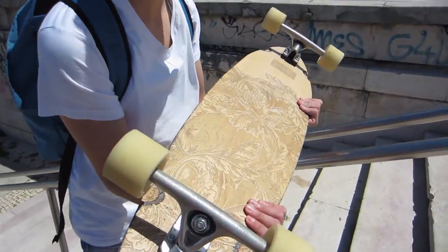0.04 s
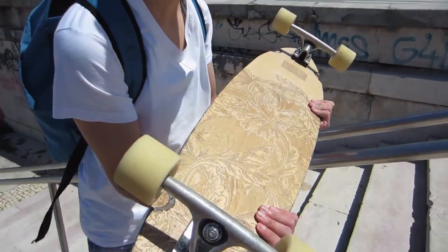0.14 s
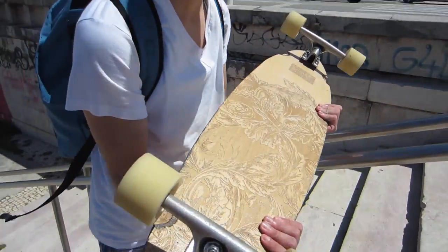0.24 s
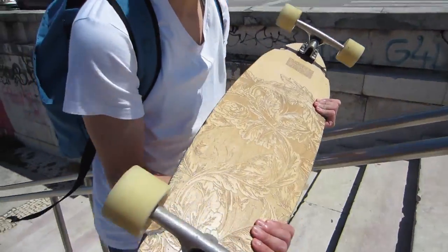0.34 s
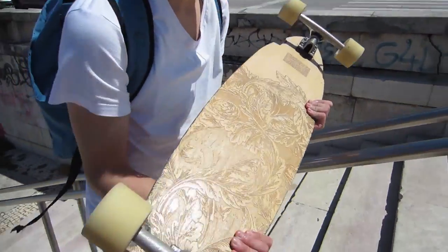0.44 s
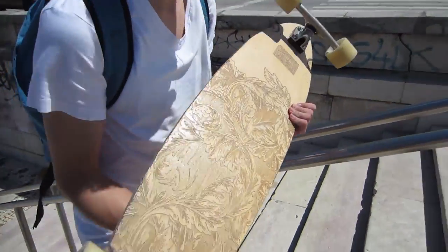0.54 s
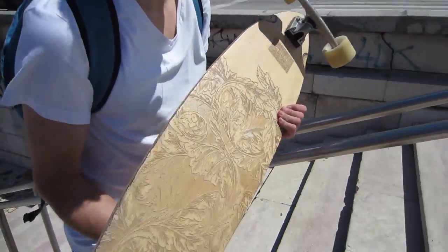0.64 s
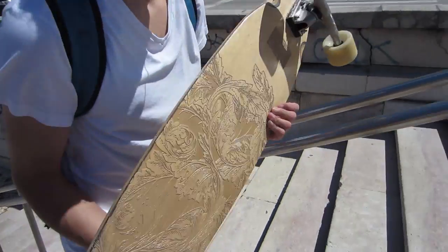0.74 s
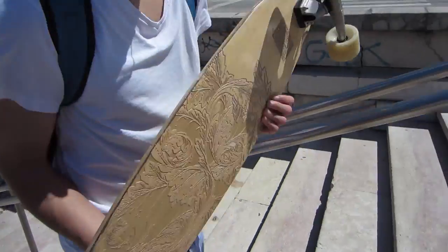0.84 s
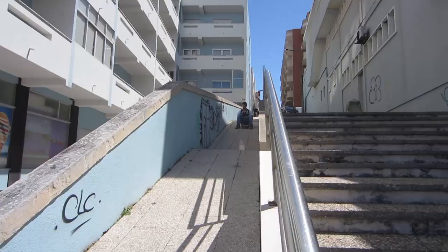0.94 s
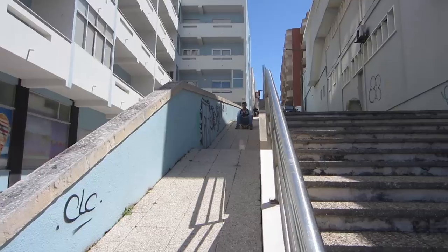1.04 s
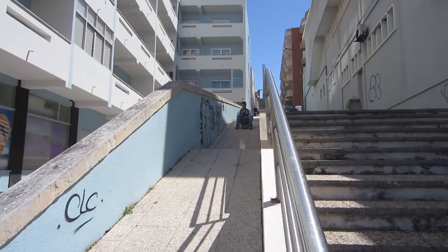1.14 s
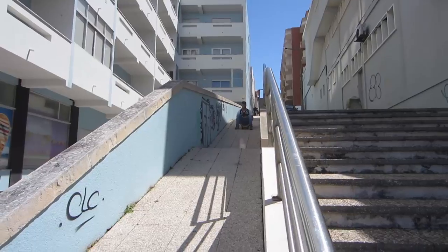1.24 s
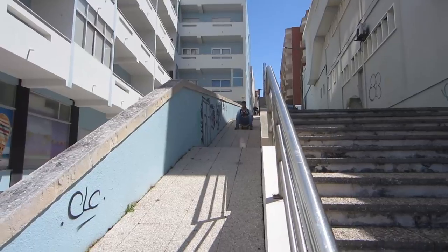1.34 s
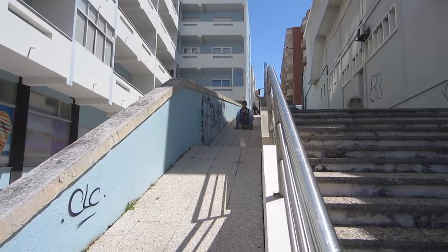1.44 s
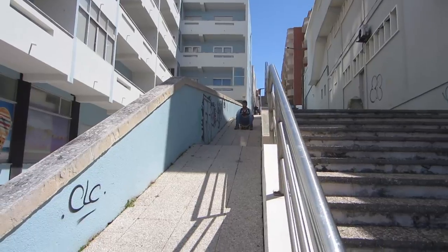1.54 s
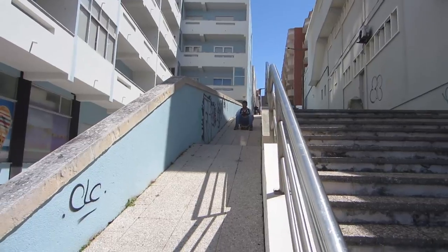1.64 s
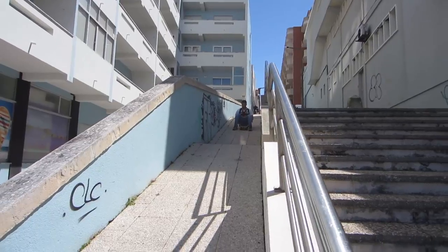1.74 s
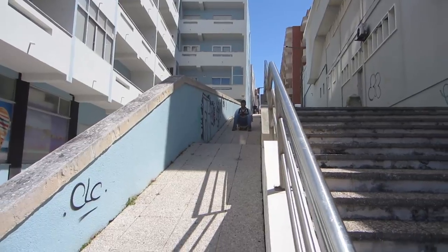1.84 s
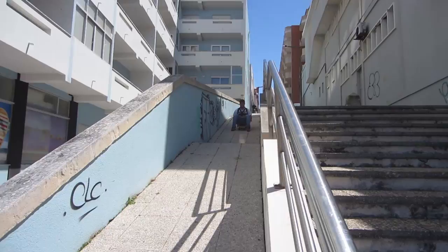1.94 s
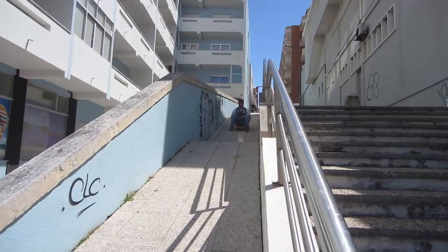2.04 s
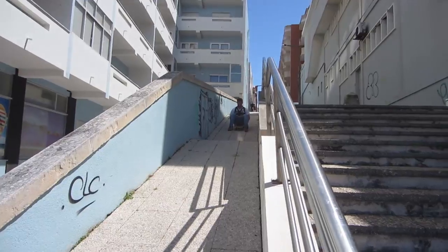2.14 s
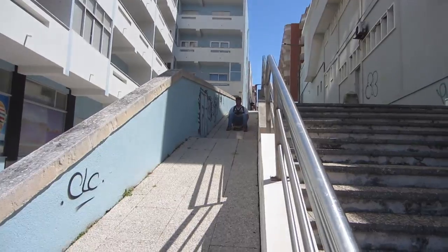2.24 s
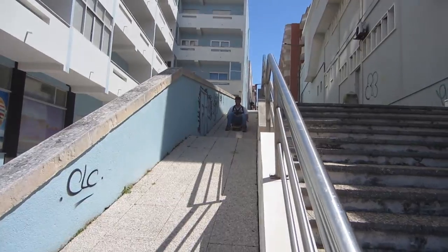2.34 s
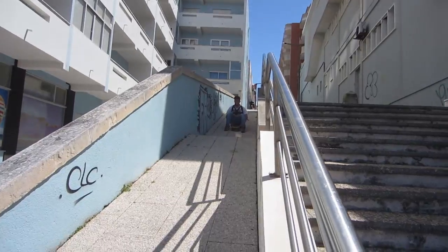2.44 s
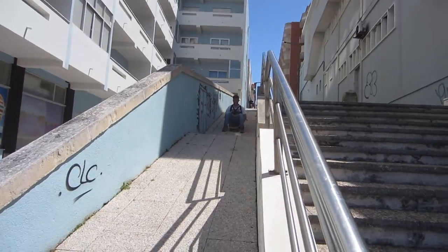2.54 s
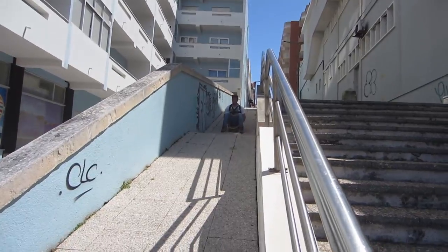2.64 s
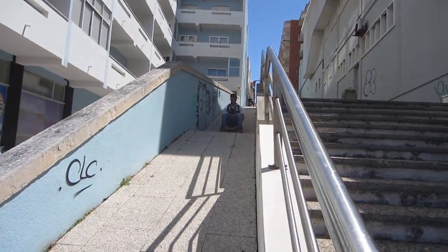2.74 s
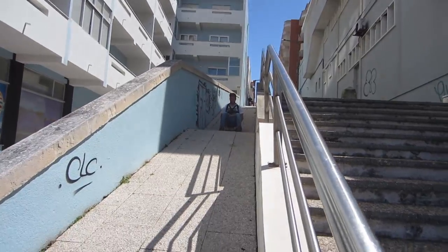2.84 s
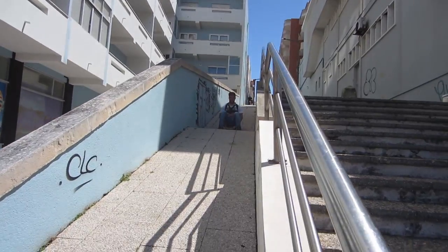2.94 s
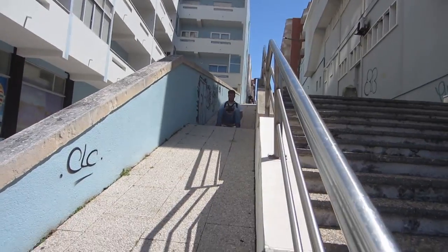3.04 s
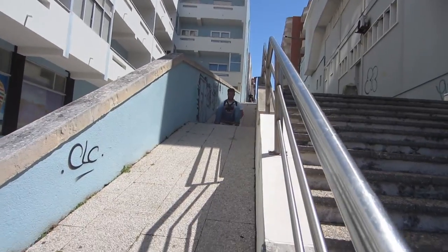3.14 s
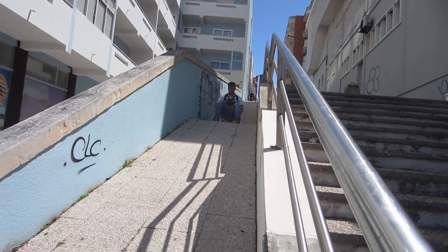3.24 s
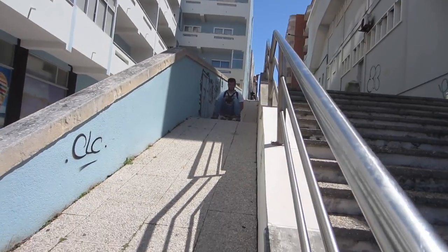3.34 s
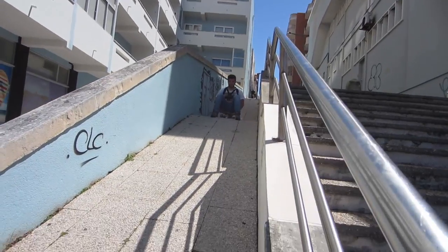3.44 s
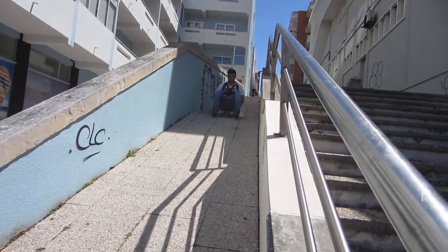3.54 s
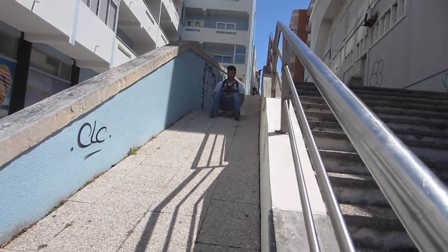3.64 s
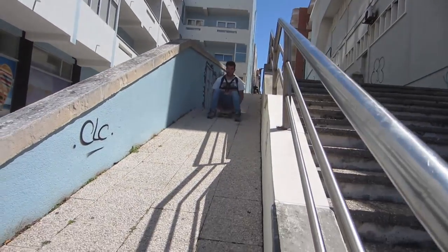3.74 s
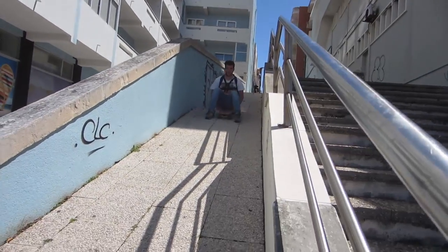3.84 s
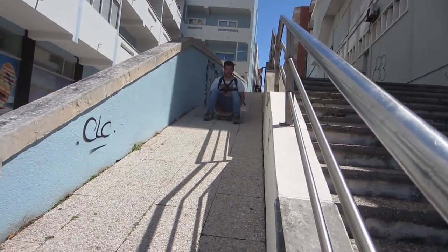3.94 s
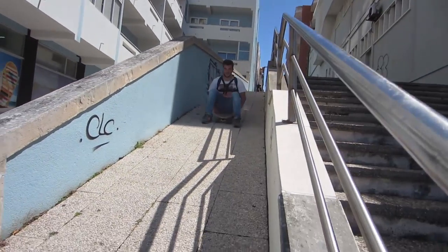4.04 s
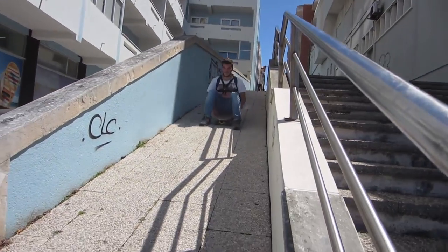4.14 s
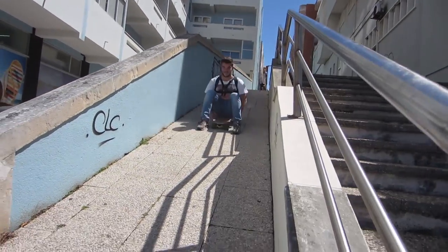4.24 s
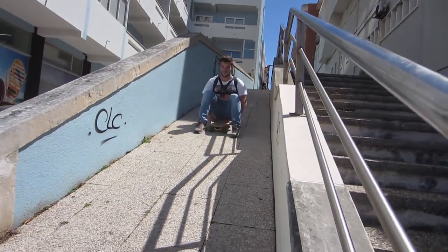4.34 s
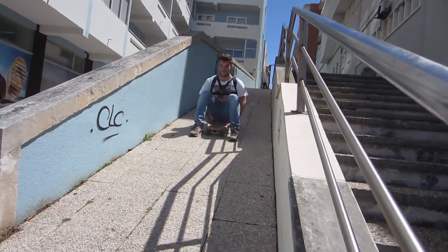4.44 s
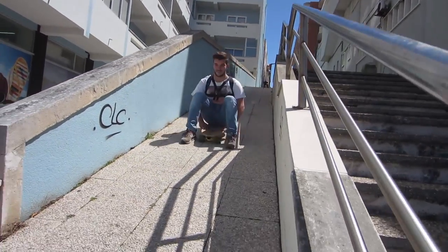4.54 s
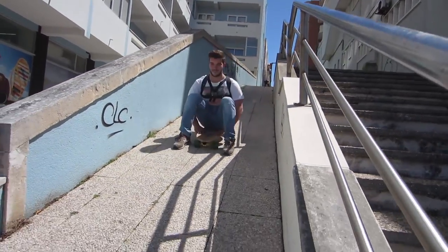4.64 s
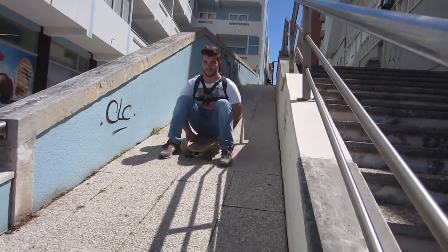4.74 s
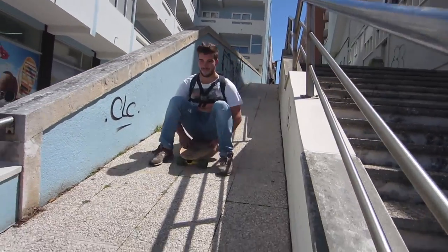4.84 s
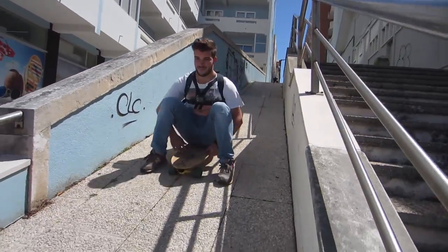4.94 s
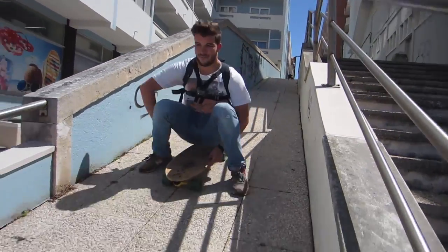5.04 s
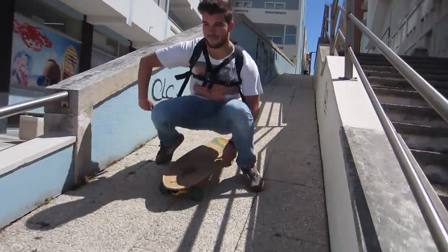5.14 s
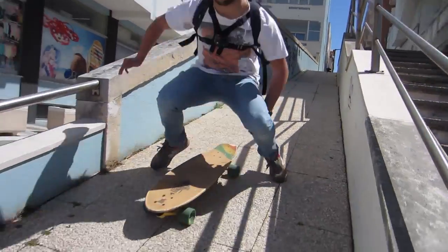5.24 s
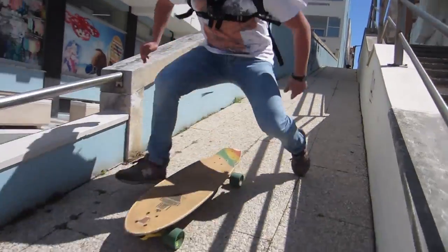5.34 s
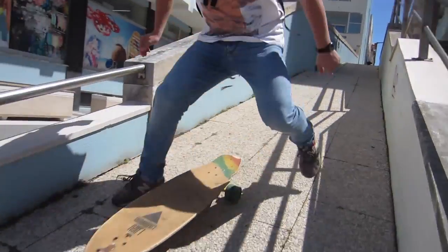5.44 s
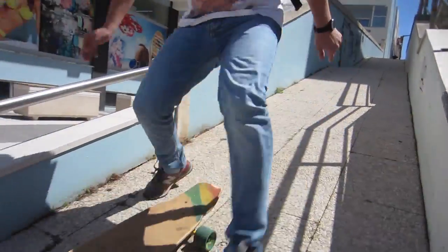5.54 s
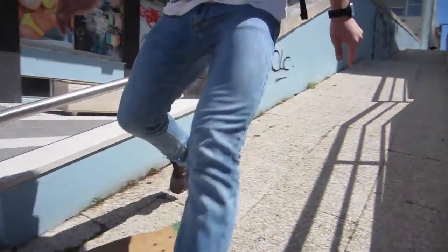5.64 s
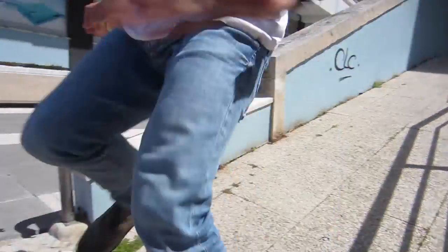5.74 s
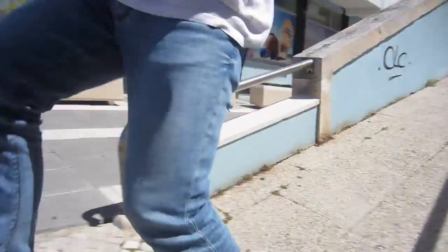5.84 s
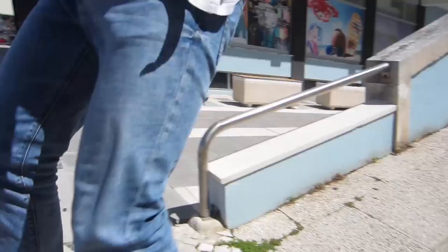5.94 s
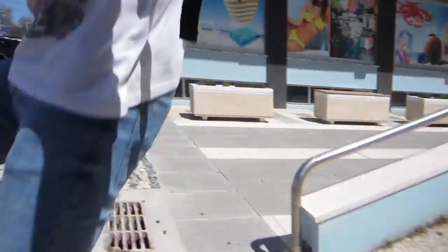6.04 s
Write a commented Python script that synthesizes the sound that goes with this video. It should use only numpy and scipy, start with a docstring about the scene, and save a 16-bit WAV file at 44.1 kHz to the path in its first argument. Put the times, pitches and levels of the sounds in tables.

```python
"""Wind first: gusts thud and flutter on two microphone ports, as noise and damped swings in opposite phase.
A longboard then rolls down a gritty tiled ramp between house walls towards a hand-held camera.
Random stone grains drive the filtered roar of wheels and deck; tile joints ring decaying modes.
The seated rider drags his shoes, bursts of grains, then jumps off and runs past on modal steps.
The riderless deck rattles and knocks; the walls echo by a delayed copy and decaying noise."""
import sys
import numpy as np
from scipy import signal
from scipy.fft import rfft, irfft, next_fast_len
from scipy.io import wavfile
from scipy.ndimage import uniform_filter1d, map_coordinates

SR = 44100
rng = np.random.default_rng(int(sys.argv[2]) if len(sys.argv) > 2 else 0)


def persist_wave(psi):
    """Save psi, clipped to +-1, as 16-bit WAV."""
    counts = np.round(np.clip(psi, -1, 1) * 32767).astype(np.int16)
    wavfile.write(sys.argv[1], SR, np.atleast_2d(counts).T)


N = 268594
T = np.arange(N) / SR  # time [s]
OPPOSED = np.array([[1], [-1]])  # left and right in opposite phase


def undb(db):
    """Level to amplitude: 20 dB is a factor of ten."""
    return 10 ** (np.asarray(db) / 20)


def unit(x):
    """Normalise the mean power to 1."""
    return x / np.sqrt(np.mean(x ** 2))


def curves(rows):
    """Linear interpolation in time of every column of a table."""
    s, *columns = np.transpose(rows)
    return [np.interp(T, s, c) for c in columns]


def noise():
    """White noise: equal mean power at every frequency."""
    return rng.standard_normal(N)


def walk(rate):
    """Low-passed randomness: a wander of rms 1 through new random values at a rate [1/s]."""
    hold = max(int(SR / rate), 1)
    held = np.repeat(rng.standard_normal(N // hold + 1), hold)
    return unit(uniform_filter1d(held, hold)[:N])


def filtered(x, response):
    """Linear filtering as a product of spectrum and frequency response, normalised to rms 1."""
    size = next_fast_len(N + SR // 2)
    f = np.fft.rfftfreq(size, 1 / SR) + 1  # offset by 1 Hz to keep clear of zero
    return unit(irfft(rfft(x, size) * response(f), size)[:N])


def colour(x, points):
    """Spectral shaping through (frequency [Hz], level [dB]) points, falling 12 dB per octave above the last."""
    hz, db = np.transpose(points)

    def response(f):
        return undb(np.interp(np.log(f), np.log(hz), db)) * np.minimum(hz[-1] / f, 1) ** 2

    return filtered(x, response)


def resonate(x, modes):
    """Parallel damped oscillators (frequency [Hz], width [Hz], relative level [dB]) driven by a sound."""
    def response(f):
        return sum(undb(db) / (1 + 1j * (f * f - hz * hz) / (f * width)) for hz, width, db in modes)

    return filtered(x, response)


def low_pass(x, order, hz):
    """Zero-phase low-pass: run forward and backward, it delays no component."""
    return signal.sosfiltfilt(signal.butter(order, hz, fs=SR, output="sos"), x)


def low_cut(x, hz):
    """High-pass filter: attenuation below a cutoff frequency."""
    return signal.sosfilt(signal.butter(2, hz, "high", fs=SR, output="sos"), x)


def grains(rate, spread_db):
    """Random impulse train of tiny impacts of either sign, with exponentially spread hardness."""
    draw = rng.random(N)
    hit = draw < rate / SR
    hardness = rng.exponential(size=N)[hit]
    side = rng.random(N)[hit] - .5
    out = np.zeros(N)
    out[hit] = np.sign(side) * undb(spread_db * np.minimum(hardness, 4))
    return unit(out)


def waver(x, share, rate):
    """Frequency modulation by uneven reading speed: all resonances drift by an rms share of their pitch."""
    position = np.cumsum(1 + share * walk(rate))
    return map_coordinates(x, [position], order=3, mode="mirror")


def envelope(start_s, length_s, attack_s, release_s):
    """Amplitude contour: a linear rise centred on the start, a hold, an exponential decay."""
    out = np.zeros(N)
    first, last = np.searchsorted(T, [start_s - attack_s, start_s + length_s + 10 * release_s])
    age = T[first:last] - start_s
    rise = np.clip(age / attack_s + .5, 0, 1)
    out[first:last] = rise * np.exp(-np.maximum(age - length_s, 0) / release_s)
    return out


def swells(rows, attack_s, release_s):
    """Superposed amplitude contours of (start [s], length [s], level [dB]) events."""
    return sum(undb(db) * envelope(s, length_s, attack_s, release_s) for s, length_s, db in rows)


def add(out, s, sound):
    """Superposition: mix a short sound in at a time [s]."""
    i = int(s * SR)
    out[i:i + len(sound)] += sound[:N - i]


def strike(modes, pitch=1, contact_s=0.00063):
    """Modal impact: decaying sines, each blow exciting and tuning them a little differently."""
    t = np.arange(SR // 4) / SR
    chance = rng.standard_normal((len(modes), 2))
    ring = 0
    for (hz, t60, db), (detune, weight) in zip(modes, chance):
        decay = undb(db + 1.5 * weight - 60 * t / t60)
        ring = ring + decay * np.sin(2 * np.pi * hz * pitch * (1 + .006 * detune) * t)
    return ring * (1 - np.exp(-t / contact_s))


def town(db=-50):
    """Ambient noise of the distant streets: a faint coloured hum under slow random level modulation."""
    # spectrum of the distant town: (frequency [Hz], level [dB])
    town_colour = [(30, -3.5), (150, 5), (400, -14.5), (1000, -17.5), (2500, -26.5), (3200, -34),
                   (6500, -37), (10000, -46.5), (15000, -56)]
    return undb(db + walk(6.8)) * colour(noise(), town_colour)


def whirr(db=-56, end_s=0.2, fade_s=0.064):
    """Stationary coloured noise with exponential decay: a faint whirr that dies away early on."""
    # spectrum of the whirr: (frequency [Hz], level [dB])
    whirr_colour = [(500, -8), (1000, -2), (2000, 2), (2500, -6), (3200, -20), (4000, -17), (6000, -20),
                    (8000, -19), (11000, -36)]
    return undb(db) * np.exp(-np.clip((T - end_s) / fade_s, 0, 20)) * colour(noise(), whirr_colour)


def breeze(mid_db=-4):
    """Low-frequency pressure noise: slow air keeps a deep, partly opposed rumble going at the ports."""
    # slow air at the ports: (time [s], level [dB])
    slow_air = [(.4, -42.5), (1.4, -31.5), (1.9, -42), (2.7, -25.5), (3.9, -43), (4.4, -29), (5.1, -38),
                (6.0, -52)]
    level_db, = curves(slow_air)
    shape = [(20, -14.0), (55, 1.5), (100, 0.5), (170, -3.0), (400, -41.5)]
    return undb(level_db) * (OPPOSED * colour(noise(), shape) + undb(mid_db) * colour(noise(), shape))


def wind(thud_mid_db=-10, flutter_mid_db=-11, eddy_db=4.5):
    """Turbulence: eddies hit the ports mostly in opposite phase, as a low thud and a higher flutter."""
    # gusts at the ports: (start [s], length [s], low thudding level [dB], fluttering level [dB])
    gust_rows = [(0, 0.2, -27, -35), (0.246, 0.12, -20.5, -29), (0.442, 0.1, -25.5, -33),
                 (0.564, 0.05, -23.5, -29.5), (0.661, 0.35, -24, -25), (2.56, 0.077, -26, -50),
                 (2.797, 0.19, -17, -51), (3.119, 0.22, -18.5, -43), (3.386, 0.099, -15.5, -21.5),
                 (3.53, 0.08, -22.5, -30.5), (4.206, 0.078, -18.5, -44), (4.483, 0.15, -14.5, -32),
                 (4.626, 0.18, -19.5, -17), (4.829, 0.07, -21, -23), (5.155, 0.046, -22, -25),
                 (5.21, 0.029, -13.5, -13), (5.302, 0.12, -17.5, -18), (5.441, 0.13, -21.5, -18.5),
                 (5.609, 0.23, -27, -32), (5.905, 0.065, -24, -22.5)]
    # spectrum of the thudding: (frequency [Hz], level [dB])
    thud_colour = [(20, -33), (45, -1), (90, 0), (150, 7.5), (220, 1.5), (320, -6.5), (600, -60)]
    # spectrum of the flutter: (frequency [Hz], level [dB])
    flutter_colour = [(120, -13.5), (240, 0.5), (330, 2), (500, -5), (800, -15), (1200, -28), (2000, -48.5),
                      (4000, -60)]
    attack_s, release_s = 0.017, 0.017
    low = swells([(s, length, db) for s, length, db, _ in gust_rows], attack_s, release_s)
    high = swells([(s, length, db) for s, length, _, db in gust_rows], attack_s, release_s)
    eddies = unit(undb(eddy_db * np.minimum(walk(90), 2)))
    thud = OPPOSED * colour(noise(), thud_colour) + undb(thud_mid_db) * colour(noise(), thud_colour)
    flutter = OPPOSED * colour(noise(), flutter_colour)
    flutter = flutter + undb(flutter_mid_db) * colour(noise(), flutter_colour)
    return eddies * (low * thud + high * flutter)


def buffets(cycles=0.37, far_port=0.35):
    """Overdamped pressure pulse: an eddy slaps one port with a short swing and pulls at the other."""
    # single eddies: (time [s], level [dB], pitch [Hz], port [positive left, negative right])
    eddy_pops = [(.267, -9.5, 260, 1), (0.332, -8.5, 243, -1), (.36, -13, 231, -1), (.475, -7.5, 148, -1),
                 (0.52, -13.5, 370, -1), (.594, -16, 600, -1), (.677, -14.5, 504, -1), (.692, -12, 486, 1),
                 (.722, -6.5, 169, -1), (.741, -8.5, 236, -1), (.75, -15, 745, -1), (.809, -6, 220, -1),
                 (.848, -10.5, 416, -1), (.872, -17, 374, -1), (0.91, -10.5, 398, -1), (.926, -21, 645, -1),
                 (1.003, -11, 498, 1), (2.545, -6, 93.7, 1), (2.845, -1, 135, 1), (2.93, -7, 150, 1),
                 (3.135, -5, 121, 1), (3.38, 0.5, 168, 1), (3.4015, -2.5, 430, 1), (3.468, 0.5, 470, 1),
                 (3.489, -3, 180, 1), (3.535, -4.5, 257, 1), (5.171, -9, 255, 1), (5.213, -11, 260, 1),
                 (5.223, -6, 300, -1), (5.235, 0, 500, 1), (5.241, -4.5, 513, -1), (5.306, -10, 300, 1),
                 (5.339, -6.5, 544, 1), (5.36, -6.5, 450, -1), (5.385, -8, 640, 1), (5.446, -11, 650, -1),
                 (5.459, -2.5, 270, 1), (5.52, -6.5, 483, 1), (5.535, -8.5, 350, -1), (5.632, -14, 400, -1),
                 (5.901, -11.5, 445, 1), (5.928, -10, 550, 1)]
    out = np.zeros((2, N))
    t = np.arange(SR // 20) / SR
    for s, db, hz, port in eddy_pops:
        age = t * hz / cycles  # the contour peaks after this share of a cycle
        pop = undb(db) * age * np.exp(1 - age) * np.sin(2 * np.pi * hz * t)
        near = int(port < 0)
        add(out[near], s, pop)
        add(out[1 - near], s, -far_port * pop)
    return out


def squeak(attack_s=0.0042, release_s=0.012):
    """Narrow resonance in rubber: it squeaks faintly as the board is carried and as the rider steps off."""
    # brief rubbery squeaks: (start [s], length [s], level [dB])
    squeak_rows = [(0.436, 0.016, -61.5), (5.366, 0.0052, -37)]
    mode = [(2460, 360, 0)]  # applied twice, which narrows the peak
    return swells(squeak_rows, attack_s, release_s) * resonate(resonate(noise(), mode), mode)


def scuffs(split_hz=3000):
    """Sliding friction: a burst of grain impacts holds while the contact slides, then dies."""
    # soles and hands scraping, grit snapping: (time [s], level [dB], hold [s], treble gain [dB])
    scrape_rows = [(0.193, -34, 0.0014, -12), (.215, -30, 0.015, 7), (0.78, -35, 0.0011, -4.5),
                   (1.007, -39, .0007, 5.5), (1.061, -26.5, 0.0013, 2.5), (1.087, -30.5, 0.0032, -1.5),
                   (2.596, -40.5, 0.013, 13), (2.67, -15.5, 0.0028, -18), (2.709, -21.5, 0.0064, -1),
                   (3.06, -32.5, 0.0043, 4), (4.527, -31.5, 0.018, 10), (5.254, -35.5, 0.0019, 11),
                   (5.284, -27, 0.016, -2), (5.347, -35, 0.016, -6), (5.493, -36, .001, 1),
                   (5.511, -33, 0.0036, -6), (5.637, -34, 0.0083, 4.5), (5.731, -31, 0.0014, 1),
                   (5.76, -35.5, 0.014, 0.5), (5.791, -40.5, 0.0032, 11.5), (5.823, -36, .005, -6),
                   (5.855, -36.5, 0.007, -6)]
    # spectrum of a scrape: (frequency [Hz], level [dB])
    scrape_colour = [(200, 11.5), (700, 6.5), (1300, 7.5), (2200, -1), (3200, -8), (5000, -9.5),
                     (8000, -19), (10500, -22), (15000, -66.5)]
    attack_s, fade_s, fade_share = .0015, 0.0064, 0.39
    scrape = colour(grains(rate=5500, spread_db=2.0), scrape_colour)
    dull = low_pass(scrape, 2, split_hz)
    out = np.zeros(N)
    for s, db, hold_s, treble_db in scrape_rows:
        # a longer slide also takes longer to die
        contact = envelope(s, hold_s, attack_s, fade_s + fade_share * hold_s)
        out += undb(db) * contact * (dull + undb(treble_db) * (scrape - dull))
    return out


def steps(crack_s=0.0012, sole_db=6.5, contact_s=0.00037, ring_t60_s=0.012):
    """Double modal impact: heel and sole slap down in turn, each with a crack of grit and decaying modes."""
    # running steps: (time [s], level [dB], heel-to-sole time [s], pitch factor, crack level [dB], ring of the
    # heel [Hz], ring level [dB])
    step_rows = [(5.4699, -1.5, 0.0016, 0.98, -10, 5400, -42), (5.7523, -7, 0.00181, 0.94, -13, 2350, -3),
                 (5.956, -9.5, 0.00119, 1.27, -9, 2270, 0.5)]
    # modes of a shoe slapping tile, before the pitch factor: (frequency [Hz], t60 [s], level [dB])
    slap_modes = [(205, 0.036, -22), (307, 0.012, -3), (673, 0.015, 0), (1193, 0.015, -6.5),
                  (1620, 0.015, -24), (2220, 0.0085, -22), (4400, 0.0053, -22.5)]
    out = np.zeros(N)
    crack_colour = [(800, -13), (2600, 18.5), (3700, 5.0), (5400, 8.0), (7200, -2), (10000, -18), (15000, -48)]
    crack = colour(noise(), crack_colour)
    t = np.arange(SR // 10) / SR
    contact = 1 - np.exp(-(t / contact_s) ** 2)
    for s, db, gap_s, pitch, crack_db, ring_hz, ring_db in step_rows:
        slap = sum(undb(mode_db - 60 * t / t60) * np.sin(2 * np.pi * hz * pitch * t)
                   for hz, t60, mode_db in slap_modes)
        ring = undb(ring_db - 60 * t / ring_t60_s) * np.sin(2 * np.pi * ring_hz * t)
        heel, sole = slap + ring, -undb(sole_db) * slap
        for start, body in ((s, heel), (s + gap_s, sole)):
            i = int(start * SR)
            blow = body + undb(crack_db) * np.exp(-t / crack_s) * crack[i:i + len(t)]
            out[i:i + len(t)] += undb(db) * contact * blow
    return out


def deck_knocks():
    """Modal impact on a free plate: without the rider's weight the deck knocks on its trucks and rings on."""
    # knocks of the riderless deck: (time [s], level [dB])
    knock_rows = [(5.637, -20), (5.771, -18.5), (5.789, -20.5), (5.85, -29.5), (5.939, -16.5), (5.961, -17),
                  (5.982, -16.5)]
    # nominal modes, a quick thump and a woody after-ring: (frequency [Hz], t60 [s], level [dB])
    knock_modes = [(437, 0.035, 2), (452.7, 0.16, -9.5), (615, 0.037, -4), (860, 0.094, -12),
                   (953, 0.063, -11), (1640, .05, -23)]
    out = np.zeros(N)
    for s, db in knock_rows:
        add(out, s, undb(db) * strike(knock_modes))
    return out


def jolts():
    """Forced vibration: tile joints excite the deck's higher modes; without its rider it rattles on."""
    # tile joints jolting the deck: (start [s], length [s], level [dB])
    jolt_rows = [(2.63, 0.023, -22), (3.055, 0.036, -23), (4.52, 0.073, -25.5), (5.44, 0.032, -29.5),
                 (5.635, 0.016, -24), (5.765, 0.029, -25.5), (5.94, 0.038, -21)]
    # hollow rattle of the riderless deck: (time [s], level [dB])
    rattle_curve = [(5.15, -54), (5.3, -41.5), (5.7, -34), (5.98, -35), (6.05, -48)]
    # higher modes of the deck: (frequency [Hz], width [Hz], level [dB])
    ring_modes = [(456, 74, -2), (568, 69, -10), (897, 49, -7.5)]
    rattle_db, = curves(rattle_curve)
    ring = resonate(grains(rate=3300, spread_db=-2.0), ring_modes)
    drive = swells(jolt_rows, attack_s=0.013, release_s=0.011)
    drive = drive + (T > rattle_curve[0][0]) * undb(rattle_db)
    return drive * colour(ring, [(150, 13.5), (400, 1.0), (1000, -6.0), (2500, -12.0)])


def drags():
    """Friction noise: braking soles grind over the tiles as dense grain impacts."""
    # the rider braking with his soles: (start [s], length [s], level [dB])
    drag_rows = [(1.24, 0.1, -36.5), (1.68, 0.11, -35.5), (2.66, 0.064, -28.5), (3.71, 0.039, -34),
                 (4.53, 0.088, -28.5), (4.97, 0.11, -30.5), (5.115, .045, -37), (5.945, 0.016, -30.5)]
    # spectrum of rubber grinding on grit: (frequency [Hz], level [dB])
    drag_colour = [(300, 1), (900, 8), (2200, 2.5), (2900, -2), (3700, -7.5), (5500, -15.5), (9000, -23),
                   (11000, -27.5), (15000, -45)]
    grind = colour(grains(rate=7000, spread_db=3.0), drag_colour)
    return swells(drag_rows, attack_s=0.043, release_s=0.016) * grind


def ticks():
    """Short resonant transients: small stones and tile edges click brightly under the wheels."""
    # clicks: (time [s], level [dB])
    click_rows = [(1.903, -39), (2.42, -44), (2.8, -45), (2.945, -38), (3.108, -40), (3.173, -50),
                  (3.235, -36.5), (3.278, -38.5), (4.27, -44), (4.525, -32), (4.569, -27)]
    # resonances of a click: (frequency [Hz], width [Hz], level [dB])
    click_modes = [(2300, 600, 1), (4000, 320, 2), (6560, 1500, -9.5)]
    fade_s = 0.0046
    strikes = sum(undb(db) * envelope(s, 0, 1 / SR, fade_s) for s, db in click_rows)
    return strikes * resonate(resonate(noise(), click_modes), [(3800, 2100, 0)])


def clunks():
    """Modal impact: the wheels drop into tile joints, and wheel and truck ring in fixed pitch ratios."""
    # drops into joints: (time [s], level [dB], nominal pitch [Hz])
    drop_rows = [(1.706, -24, 860), (1.936, -26, 675.4), (2.318, -18.5, 382), (2.49, -18, 556),
                 (2.77, -18.5, 470), (3.191, -25, 440), (3.255, -15.5, 484), (4.205, -29, 827),
                 (4.438, -13, 764), (4.646, -18, 367), (4.711, -22, 790), (4.742, -11.5, 394),
                 (4.861, -19, 590), (4.904, -22, 684)]
    # modes of wheel and truck: (multiple of the pitch, t60 [s], level [dB])
    drop_modes = [(1, .03, -1.5), (1.7, .02, -13.5), (2.9, 0.015, -1.5)]
    out = np.zeros(N)
    for s, db, hz in drop_rows:
        add(out, s, undb(db) * strike(drop_modes, hz))
    return out


def clatter():
    """Impulse response of the trucks: each coarse stone rings one drifting mode for a few milliseconds."""
    # modes of wheels and trucks before drift: (frequency [Hz], width [Hz], level [dB])
    truck_modes = [(437, 210, -3), (584, 180, -2), (807, 64, -0.5), (1215, 150, -5.5), (1745, 180, -5.5),
                   (2260, 1100, -5)]
    rings = 0
    for hz, width, db in truck_modes:
        stones = grains(rate=50, spread_db=2.2)
        mode = signal.lfilter(*signal.iirpeak(hz, hz / width, fs=SR), stones)
        rings = rings + undb(db) * unit(mode)
    return unit(waver(rings, share=.06, rate=7))


def wheels(knock_db=-8, patch_db=0.5, wander_db=1.72, grit_knock_db=-2.5):
    """Roughness excitation: stone grains make the wheels roar and knock, grit crackle and the deck boom."""
    # rolling level, set by speed, distance and load: (time [s], level [dB])
    roll_curve = [(1.008, -46), (1.05, -39), (1.58, -36), (1.7, -33.5), (2.3, -34), (2.52, -31),
                  (2.7, -28.5), (2.85, -31), (2.97, -37), (3.14, -32), (3.46, -36.5), (3.475, -46),
                  (3.58, -56), (3.67, -49.5), (3.76, -42), (3.86, -38.5), (4.05, -33.5), (4.38, -28),
                  (4.57, -26.5), (4.85, -34), (5.12, -31.5), (5.2, -38.5), (5.38, -47), (5.55, -51.5),
                  (6.09, -51)]
    # deck boom, growing with speed and fading as the rider lifts his weight: (time [s], level [dB])
    boom_curve = [(1.03, -39), (1.6, -35), (1.72, -32.5), (2.4, -29.5), (3.1, -28.5), (3.7, -38),
                  (4.1, -28), (4.55, -26), (4.95, -32.5), (5.5, -55)]
    # slow wheels roar with little body, which fills in with speed: (time [s], gain of the lows [dB])
    body_curve = [(1.3, -6), (2.2, -2.5), (2.6, -1), (3.4, -.5), (4.4, 0), (5.05, -0.5)]
    # spectrum of the wheel roar: (frequency [Hz], level [dB])
    roar_colour = [(100, -9.5), (250, 7.5), (450, 2), (680, 1.5), (1100, -0.5), (1500, -6), (2100, -6),
                   (2600, -10.5), (3300, -24), (5000, -33), (9000, -70)]
    # spectrum of crushed grit: (frequency [Hz], level [dB])
    grit_colour = [(1500, -1.5), (3000, 9), (4200, 0.5), (5500, -2), (7500, -9), (9500, -12.5),
                   (11000, -17.5), (15000, -16)]
    # low resonances of the loaded deck before drift: (frequency [Hz], width [Hz], level [dB])
    deck_modes = [(147.7, 50, -1), (189, 36, -7), (288, 50, -10.5)]
    roar_db, grit_db, clatter_db = 2, -14.5, -1  # relative to the rolling level
    level_db, = curves(roll_curve)
    boom_db, = curves(boom_curve)
    body_db, = curves(body_curve)

    bumps = grains(rate=5000, spread_db=2.5)
    patches = undb(patch_db * walk(45))  # rougher and smoother spots of tile
    # a coarse stone chatters under the wheel for a few milliseconds
    chatter = signal.lfilter([1], [1, -np.exp(-1 / (.003 * SR))], grains(rate=60, spread_db=1.4))

    roar = undb(roar_db) * colour(bumps + undb(knock_db) * unit(chatter * noise()), roar_colour)
    roar = roar + undb(clatter_db) * colour(clatter(), [(200, 4.5), (2400, -3.0), (3300, -21.5)])
    roar = roar + (undb(body_db) - 1) * low_pass(roar, 2, 950)
    # shifting load on the wheels lets each region of the roar swell on its own
    for hz in (550, 1200, 2200):
        band = signal.lfilter(*signal.iirpeak(hz, 2, fs=SR), roar)
        roar = roar + (undb(wander_db * walk(16)) - 1) * band

    crushed = grains(rate=7700, spread_db=-0.5) + undb(grit_knock_db) * unit(chatter * noise())
    grit = undb(grit_db) * colour(crushed, grit_colour)
    boom = colour(resonate(bumps, deck_modes), [(40, -17.5), (120, 2.0), (350, 2.0), (900, -46.0)])
    boom = waver(boom, share=.11, rate=12)
    rolling = T > roll_curve[0][0]
    return rolling * (undb(level_db) * patches * (roar + grit) + undb(boom_db) * boom)


def side_wall(x):
    """Comb filtering: a close, dull echo off the wall beside the ramp, its peaks sliding as the delay moves."""
    # extra path, longer as the board comes near: (time [s], delay [s])
    path_curve = [(2.7, 0.0016), (3.9, 0.0023), (4.5, 0.00306)]
    wall_share = .3
    lag_s, = curves(path_curve)
    dull = low_pass(x, 1, 1600)
    sway_s = .0001 * walk(6)
    return x + wall_share * np.interp(T - lag_s - sway_s, T, dull)


def walls(x, low_t60_s=0.33, treble_t60_s=0.28):
    """Diffuse reverberation of the house fronts: decaying noise, unlike in each channel, treble dying first."""
    t = np.arange(SR) / SR
    hiss = rng.standard_normal((2, SR))
    low = signal.sosfilt(signal.butter(1, 2500, fs=SR, output="sos"), hiss)
    tail = low * undb(-60 * t / low_t60_s) + (hiss - low) * undb(-60 * t / treble_t60_s)
    tail = tail * (t > .004)  # the first echo needs time to return
    tail /= np.sqrt(np.sum(tail ** 2, axis=1, keepdims=True))
    mid, side = signal.fftconvolve(x[None], tail, axes=1)[:, :N]
    # close-set ports hear long waves alike
    side = signal.sosfilt(signal.butter(1, 900, "high", fs=SR, output="sos"), side)
    return mid + OPPOSED * side


def scene(pan_db=-1.84, board_echo_db=-11.5, near_echo_db=-23):
    """Direct and reverberant fields: direct sound slightly right of centre, the close sounds nearly dry."""
    board = side_wall(wheels() + clunks() + drags() + ticks())
    near = low_cut(steps() + scuffs() + jolts() + deck_knocks() + squeak(), hz=91.5)
    direct = (board + near) * undb(OPPOSED * pan_db / 2)
    echo = walls(undb(board_echo_db) * board + undb(near_echo_db) * near)
    air = wind() + low_cut(buffets(), hz=55) + breeze()
    return direct + echo + air + whirr() + town()


def record(dry, shelf_hz=9300, shelf_db=-16, top_hz=15800):
    """Overload and band limiting: the camera clips the hardest peaks, dulls the treble and cuts the top."""
    loud = np.clip(dry, -1, 1)
    dull = low_pass(loud, 5, shelf_hz)
    shelved = dull + undb(shelf_db) * (loud - dull)
    return signal.sosfilt(signal.ellip(8, .2, 70, top_hz, fs=SR, output="sos"), shelved)


dry = scene()
out = record(dry)
persist_wave(out)
```